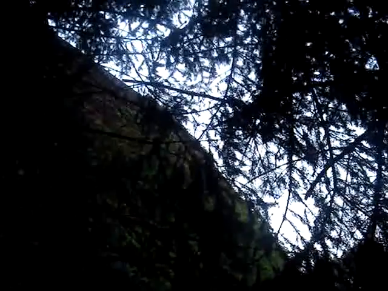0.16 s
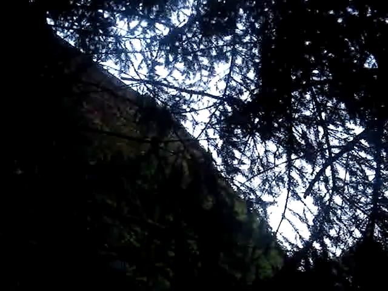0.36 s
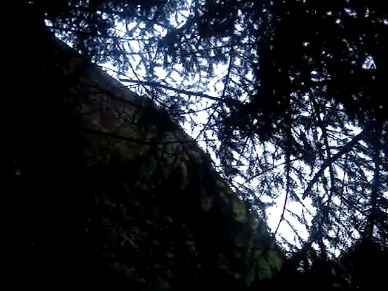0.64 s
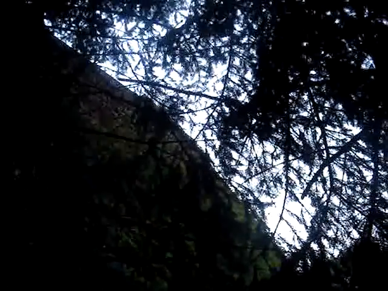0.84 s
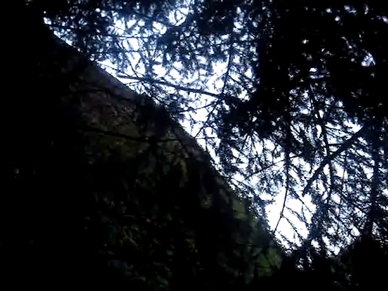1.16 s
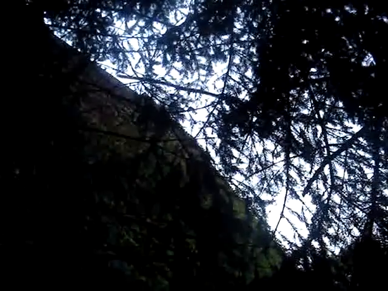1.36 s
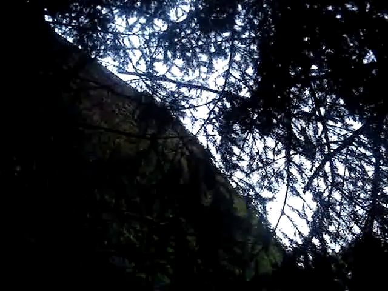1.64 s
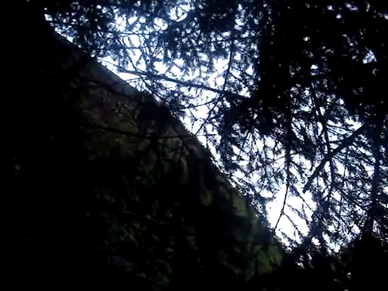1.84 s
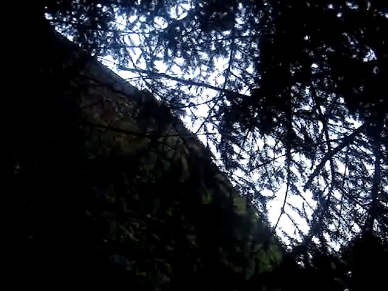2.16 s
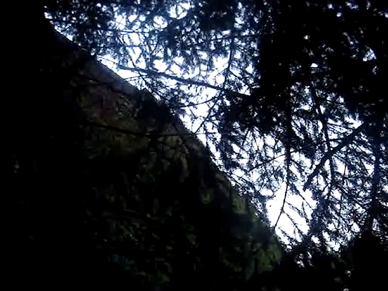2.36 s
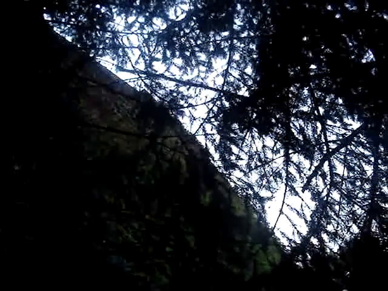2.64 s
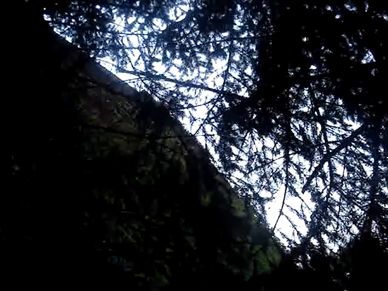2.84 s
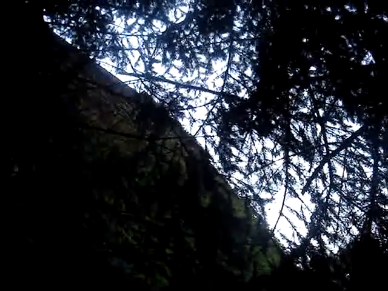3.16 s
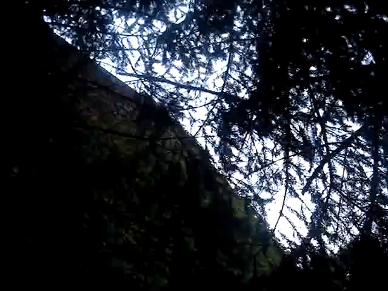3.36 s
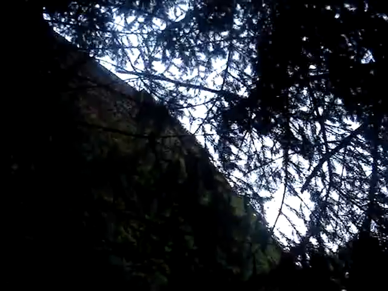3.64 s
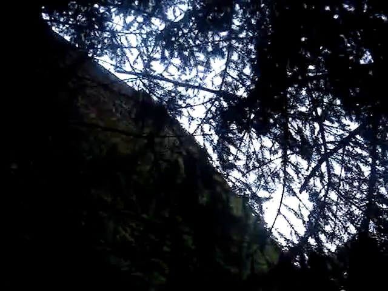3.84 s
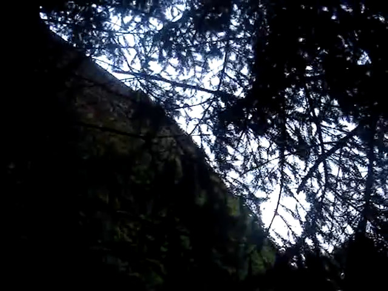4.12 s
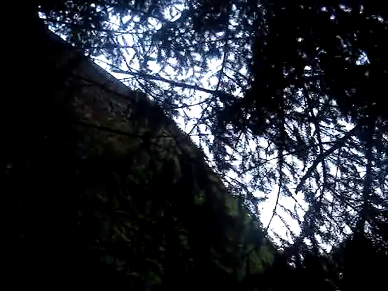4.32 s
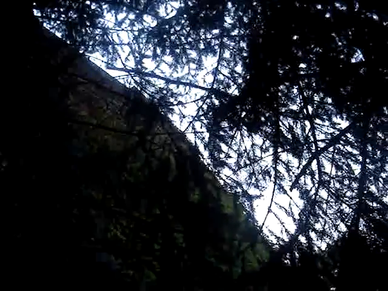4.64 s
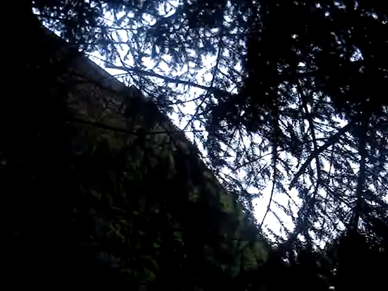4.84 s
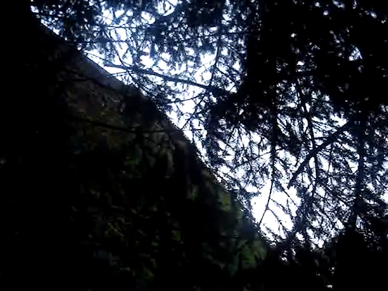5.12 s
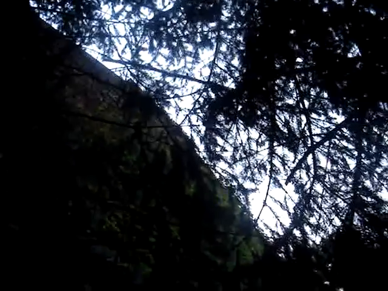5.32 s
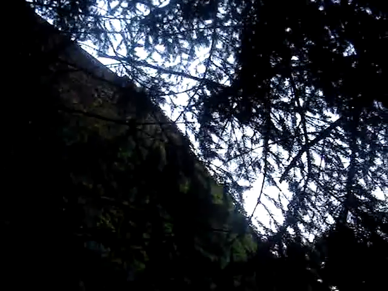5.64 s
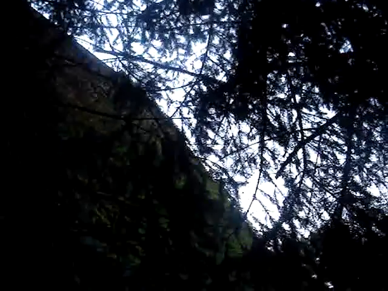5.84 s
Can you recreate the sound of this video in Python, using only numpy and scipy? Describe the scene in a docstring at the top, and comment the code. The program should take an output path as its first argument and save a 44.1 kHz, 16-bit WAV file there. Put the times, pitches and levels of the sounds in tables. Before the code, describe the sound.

Already in full cry at the start, countless birds twitter overhead, swelling and easing in quick flurries. Close chirps come first, crisp chips break through from one second, and faint low calls blur behind later. Squeaky, raspy squabbling adds treble. A single microphone below the trees also catches dim air noise and a far engine wavering, then speeding up near the end.

```python
"""A large flock of small birds chatters in the crowns of tall conifers, heard from the ground.
From the start near birds stand out in chains of arched whistles, while hundreds more merge in the wood's echo.
Sharp chips break through from one second on; soft low calls join later, between about 1.7 and 4.6 seconds.
Filtered noise gives the murmur of the outdoors and a faint drone; under it the two harmonics and noise
of a far engine waver in pitch, drop lowest at about 2.65 seconds, then speed up to the end."""
import sys
import numpy as np
from scipy import signal
from scipy.fft import rfft, irfft
from scipy.io import wavfile
from scipy.ndimage import uniform_filter1d

SR = 44100
rng = np.random.default_rng(int(sys.argv[2]) if len(sys.argv) > 2 else 0)


def wav_record(signal):
    """Record a signal, one row per channel, as 16-bit PCM in the file named by sys.argv[1]."""
    frames = np.transpose(np.atleast_2d(signal))
    bounded = np.clip(frames, -1, 1)
    # unit amplitude maps onto the largest positive 16-bit level
    quanta = np.round(bounded * 32767).astype(np.int16)
    wavfile.write(sys.argv[1], SR, quanta)


N = 263718

# Course of the flock's ordinary chatter. Each row: time in seconds, relative level in dB.
CHATTER_LEVEL = [(0.0, -32.5), (0.6, -25), (0.77, -33), (0.99, -27), (1.95, -28.9), (2.17, -25),
                 (2.38, -33.2), (2.6, -27), (3.04, -34), (3.11, -27), (3.25, -31), (3.52, -25.5),
                 (3.59, -32.5), (3.69, -30), (4.18, -27.5), (4.25, -30.5), (4.41, -22), (4.48, -29),
                 (4.55, -25.5), (5.12, -34.5), (5.32, -32), (5.64, -34), (5.81, -26.5), (5.98, -35.5)]
# Course of the treble, the high and excited calls. Each row: time in seconds, relative level in dB.
SHRILL_LEVEL = [(0.0, -45.7), (0.55, -37.5), (0.78, -48.5), (1.03, -39.5), (1.33, -40.5), (1.4, -37),
                (1.85, -38.5), (2.03, -47.9), (2.1, -35.5), (2.49, -42.5), (2.56, -38), (2.87, -43.5),
                (2.94, -43), (3.03, -50.5), (3.38, -39.5), (3.66, -54), (3.77, -40.5), (4.7, -41.5),
                (4.82, -36.5), (4.89, -47), (5.6, -45), (5.67, -40.5), (5.91, -48.5), (5.98, -35)]
# Course of the birds in the farthest trees. Each row: time in seconds, relative level in dB.
FAR_LEVEL = [(0, -35), (1.6, -37.5), (2.3, -34), (3.0, -37.5), (4.6, -38), (5.1, -40)]
# Small throats give little at the bottom of their range. Each row: frequency in Hz, gain in dB.
THROAT_RESPONSE = [(2000, -6), (2600, -3), (3100, 1), (4300, 0), (5200, -4)]
# Spectrum of the farthest calls. Each row: frequency in Hz, relative level in dB.
FAR_SPECTRUM = [(1500, -21.5), (2100, 1.5), (2700, 6.5), (4500, -6.5), (6200, -4), (10000, -21.5)]
# Two-note chirps of the nearest birds.
# Each row: start in seconds, length in seconds, starting pitch in Hz, relative level in dB.
NEAR_CHIRPS = [(0.093, 0.066, 4290, -26.5), (0.417, .084, 4650, -18.5), (0.59, 0.094, 4406, -25.5),
               (0.908, 0.066, 4750, -28), (1.025, 0.095, 4300, -32.5), (2.117, 0.092, 4565, -18.5),
               (4.356, .082, 4410, -27), (4.407, .078, 4510, -24), (5.299, 0.063, 4300, -21.5),
               (5.765, 0.098, 4500, -27)]
# Sharp chips, a flick of pitch up and down. Each row: start in seconds, top pitch in Hz, relative level in dB.
NEAR_CHIPS = [(1.018, 4650, -15.5), (1.735, 4360, -23), (2.686, 4960, -21), (3.373, 4620, -14.5),
              (4.347, 4250, -22), (5.752, 5020, -24.5)]
# Single notes of near birds.
# Each row: start in seconds, length in seconds, starting pitch in Hz, final pitch in Hz, relative level in dB.
NEAR_PEEPS = [(0.55, 0.053, 4660, 4560, -28.5), (0.563, 0.052, 3250, 3720, -24.5),
              (0.637, 0.034, 3060, 3056, -26), (0.77, 0.091, 5550, 3040, -34),
              (0.945, 0.029, 3410, 3370, -25.5), (0.977, 0.033, 4710, 5190, -26),
              (1.07, 0.063, 2967, 3200, -26), (1.117, 0.037, 3240, 3170, -25.5),
              (1.168, 0.036, 5900, 4270, -28.5), (1.258, 0.026, 3730, 3280, -29),
              (1.3, 0.13, 4680, 4750, -29), (1.61, .035, 3135, 3400, -31), (1.728, 0.034, 4400, 4820, -28),
              (1.798, 0.013, 6580, 6330, -35), (1.864, 0.041, 4050, 3400, -25),
              (1.973, .061, 4490, 4170, -29.5), (2.094, 0.028, 4720, 4380, -27.5),
              (2.242, .036, 3300, 3210, -27), (2.737, 0.023, 3670, 2820, -25.5),
              (2.772, 0.062, 3000, 3800, -29.5), (2.891, .059, 6870, 8260, -41.5),
              (2.915, 0.084, 3690, 3415, -27), (2.975, .04, 2250, 2050, -42.5),
              (3.12, 0.055, 3500, 3380, -34), (3.38, 0.024, 4010, 3280, -25),
              (3.417, 0.0546, 2953, 3080, -24.5), (3.515, 0.048, 3450, 3034, -27.5),
              (3.699, .027, 3940, 4600, -28), (3.937, 0.064, 4450, 3470, -34),
              (4.004, 0.053, 3100, 4000, -28), (4.049, 0.051, 3380, 3140, -29.5),
              (4.157, 0.057, 3400, 3480, -30), (4.539, .029, 3700, 3300, -25.5),
              (4.607, 0.085, 4530, 3740, -27.5), (4.664, 0.051, 2970, 3530, -27.5),
              (4.745, 0.08, 4170, 3830, -27.5), (4.813, .065, 4440, 3300, -30),
              (5.268, 0.034, 4880, 4400, -39.5), (5.321, .06, 3920, 2440, -26.5),
              (5.491, 0.1, 4030, 3850, -37), (5.651, 0.039, 4450, 3220, -35),
              (5.656, 0.035, 8300, 7200, -37), (5.782, 0.068, 7470, 6530, -42),
              (5.878, .032, 3750, 3070, -31), (5.948, 0.026, 4820, 5100, -32)]
# Faint low calls from farther off.
# Each row: start in seconds, length in seconds, top pitch in Hz, relative level in dB.
LOW_CALL_NOTES = [(1.719, 0.095, 1500, -51), (2.361, .1, 1460, -46.5), (2.535, .12, 1400, -47.5),
                  (3.096, 0.087, 1270, -51), (3.36, 0.086, 1590, -50), (4.537, 0.089, 1373, -48)]
# Spectrum of the outdoor murmur. Each row: frequency in Hz, relative spectral density in dB.
AIR_SPECTRUM = [(20, -17), (50, -2), (80, 2), (430, -1.5), (800, 0.5), (1700, -1.5), (6500, -10.5),
                (10000, -29.5)]
# Faint distant drone bands. Each row: centre in Hz, full width at half amplitude in Hz, level in dB.
DRONE_BANDS = [(220.6, 9.1, -61.5), (336.2, 4.1, -59.5), (438.6, 55, -54.5)]
# Course of the far engine. Each row: time in seconds, mean firing rate in Hz, relative level in dB.
ENGINE_COURSE = [(0, 85.6, -62.5), (1.1, 88, -55.5), (2.2, 79.6, -56), (2.5, 84, -50.5), (2.65, 69.7, -57),
                 (4.85, 74.95, -53.5), (5.35, 81.1, -47), (5.98, 96, -48)]

BOW = 1.04  # the middle of a note bulges above a straight glide by this ratio
FALL_RATIO, ARCH_RATIO = 0.77, 0.74  # end of the falling note and top of the arch, against the starting pitch
FALL_SHARE, ARCH_DB = 0.37, -1.5  # share of the chirp that the falling note takes; level of the arch
ARCH_RISE, ARCH_SAG = 0.87, 0.96  # the arch's start and end against its top
CHIP_S, CHIP_FOOT = 0.016, 0.78  # length of a chip in seconds; its start and end against the top pitch
TOP_HZ = 10100  # upper band edge


def whistle(length, start_hz, mid_hz, end_hz, waver=0.025, flutter_db=4.0, octave_db=-27, skew=0.9):
    """Frequency modulation: the syrinx sounds a trembling arch of pitch with a weak second harmonic."""
    t = np.arange(int(max(length, 0.01) * SR)) / SR
    u = t / t[-1]
    glide_hz = start_hz + (end_hz - start_hz) * u
    arch_hz = (mid_hz - (start_hz + end_hz) / 2) * 4 * u * (1 - u)
    trembling_hz = (glide_hz + arch_hz) * (1 + waver * wander(t, 494.0))
    phase = 2 * np.pi * np.cumsum(trembling_hz) / SR
    # skew below 1 makes the note start faster than it dies away
    effort = np.sqrt(np.abs(np.sin(np.pi * u ** skew)))
    effort = effort * undb(flutter_db * wander(t, 233.6))
    tone = np.sin(phase) + undb(octave_db) * np.sin(2 * phase)
    return unit(effort) * np.sqrt(2) * tone


def crowd(count, pitch_hz, drop, echo_db, pitch_spread=0.085, glide=0.72, glide_spread=0.1098,
          turn_spread=0.0797, waver=0.0329):
    """Superposition: birds at all distances each add a mostly falling note, then an arch lower by drop."""
    out = np.zeros(N + SR)  # the flock is already calling a second earlier
    starts = (np.arange(count) + rng.random(count)) / count * len(out) / SR
    for s, (voice, far, pace, bend, turn) in zip(starts, rng.standard_normal((count, 5))):
        hz = pitch_hz * np.exp(pitch_spread * voice)
        length = 0.033 * np.exp(0.3 * pace)
        gain = undb(7 * np.tanh(far / 2))
        lean = np.exp(glide_spread * np.tanh(bend))
        add(out, s, gain * whistle(length, hz / lean, hz * BOW, hz * glide * lean, waver))
        low_hz = hz * drop
        tilt = np.exp(turn_spread * np.tanh(turn))
        arch = whistle(length, low_hz * 1.06 / tilt, low_hz, low_hz * 0.84 * tilt, waver)
        add(out, s + length, gain * arch)
    out = (out + undb(echo_db) * wood(out, t60=0.18, count=2000))[SR:]
    # so many callers together keep an even level: divide by the short-term rms
    return out / np.sqrt(uniform_filter1d(out ** 2, SR // 14) + 1e-12)


def harsh_rasp(t):
    """Amplitude-modulated noise: harsh calls add short spurts of broad noise."""
    noise = rng.standard_normal(N)
    rasp = unit(colour(noise, [(2000, -20.5), (4500, 5.0), (10000, -17)]))
    return rasp * undb(10.7 * np.tanh(wander(t, 45)))


def farthest_calls(t, chatter_db, follow):
    """Statistical limit: very many smeared calls tend to noise, here a flickering wash."""
    wash = unit(colour(rng.standard_normal(N), FAR_SPECTRUM))
    wash *= undb(2 * wander(t, 25.36))
    # it swells by a part of the nearer chatter's swing in dB
    return wash * undb(follow * (chatter_db - chatter_db.mean()))


def flock(chirps_db=1, shrill_db=2.0, squeaks_db=-7, rasp_db=-4.0, far_db=0.0, echo_db=-6.5, follow=0.53):
    """Addition of bands: chirps, shrill squabbling with squeaks and rasp, and the far blur, each with a level."""
    t = np.arange(N) / SR
    chatter_db, = curves(CHATTER_LEVEL)
    high_db, = curves(SHRILL_LEVEL)
    far_level_db, = curves(FAR_LEVEL)
    chirps = colour(crowd(count=560, pitch_hz=4067, drop=0.82, echo_db=echo_db), THROAT_RESPONSE)
    shrill = crowd(count=300, pitch_hz=5116, drop=0.92, echo_db=echo_db)
    squeaks = crowd(count=200, pitch_hz=7350, drop=0.9, echo_db=echo_db, pitch_spread=0.19)
    excited = undb(shrill_db) * shrill + undb(squeaks_db) * squeaks
    excited += undb(rasp_db) * harsh_rasp(t)
    # flurries of calling lift and lower both bands together, many times a second
    flurry = np.tanh(wander(t, 11))
    chirps *= undb(1.6 * flurry)
    excited *= undb(2 * flurry)
    far = farthest_calls(t, chatter_db, follow)
    out = undb(chatter_db + chirps_db) * chirps
    out += undb(high_db) * excited
    return out + undb(far_level_db + far_db) * far


def chirp(length, hz, overlap_s=0.0046, waver=0.028, flutter_db=3):
    """Successive glides: a falling note overlaps the start of a lower arch."""
    fall_s = length * FALL_SHARE
    end_hz, top_hz = hz * FALL_RATIO, hz * ARCH_RATIO
    out = np.zeros(int(length * SR))
    fall = whistle(fall_s + overlap_s, hz, BOW * (hz + end_hz) / 2, end_hz, waver, flutter_db)
    arch = whistle(length - fall_s, top_hz * ARCH_RISE, top_hz, top_hz * ARCH_SAG, waver, flutter_db)
    add(out, 0, fall)
    add(out, fall_s, undb(ARCH_DB) * arch)
    return out


def near_birds(chirps_db=-1, chips_db=-3.0, peeps_db=-1.56, boughs_db=-12, trunks_db=-13, scatter_db=-6):
    """Direct and scattered sound: near calls, quick scatter from boughs, a longer tail from trunks."""
    out, peeps = np.zeros(N), np.zeros(N)
    for s, length, hz, db in NEAR_CHIRPS:
        add(out, s, undb(db + chirps_db) * chirp(length, hz))
    for s, hz, db in NEAR_CHIPS:
        foot_hz = hz * CHIP_FOOT
        chip = whistle(CHIP_S, foot_hz, hz, foot_hz, flutter_db=6, skew=0.63)
        add(out, s, undb(db + chips_db) * chip)
    for s, length, start_hz, end_hz, db in NEAR_PEEPS:
        mid_hz = BOW * (start_hz + end_hz) / 2
        add(peeps, s, undb(db + peeps_db) * whistle(length, start_hz, mid_hz, end_hz, waver=0.03))
    # the single notes come from deeper in the foliage and are scattered more
    out += peeps + undb(scatter_db) * wood(peeps, t60=0.032, count=2000)
    boughs = undb(boughs_db) * wood(out, t60=0.081, count=2000)
    trunks = undb(trunks_db) * wood(out, t60=0.13, count=2000)
    return out + boughs + trunks


def low_callers(gain_db=1.1, echo_db=-4, droop=0.84):
    """Reverberant blur: soft, wavering arches well below the flock's pitch are smeared by the wood."""
    out = np.zeros(N)
    for s, length, hz, db in LOW_CALL_NOTES:
        add(out, s, undb(db + gain_db) * whistle(length, hz * droop, hz, hz * droop, waver=0.049))
    return out + undb(echo_db) * wood(out, t60=0.068, count=2000)


def wood(x, t60, count):
    """Multiple reflection: trunks and boughs return count echoes that decay 60 dB in t60 seconds."""
    delay, size = rng.random(count) * 0.8, rng.standard_normal(count)
    echoes = np.zeros(SR)
    decay = np.exp(-np.log(1000) * delay / t60)
    np.add.at(echoes, ((delay + 0.003) * SR).astype(int), size * decay)
    return signal.fftconvolve(x, echoes / np.linalg.norm(echoes))[:len(x)]


def far_engine(t, engine_db, second_db):
    """Periodic excitation: the firing rate sets a fundamental and second harmonic, with a broad roar."""
    firing_hz, level_db = curves(ENGINE_COURSE)
    phase = 2 * np.pi * np.cumsum(firing_hz * (1 + 0.0092 * wander(t, 10))) / SR
    note = unit(np.sin(phase) + undb(second_db) * np.sin(2 * phase))
    roar = unit(colour(rng.standard_normal(N), [(40, -25), (120, -3.0), (800, 5.0), (3000, -49)]))
    return undb(level_db + engine_db) * (note * undb(wander(t, 11.0)) + roar)


def drone():
    """Resonance: narrow peaks select steady hums from noise."""
    f = np.fft.rfftfreq(N, 1 / SR)
    out = np.zeros(N)
    for hz, width, db in DRONE_BANDS:
        resonance = 1 / (1 + (2 * (f - hz) / width) ** 2)
        out += undb(db) * unit(irfft(rfft(rng.standard_normal(N)) * resonance, N))
    return out


def distance(air_db=-40.5, engine_db=0, second_db=-14):
    """Background noise: slowly wavering outdoor murmur, a faint drone and a far engine."""
    t = np.arange(N) / SR
    murmur = unit(colour(rng.standard_normal(N), AIR_SPECTRUM)) * undb(air_db + 0.5 * wander(t, 2))
    return murmur + drone() + far_engine(t, engine_db, second_db)


def undb(db):
    """Logarithmic level: decibels to amplitude gain."""
    return 10 ** (np.asarray(db) / 20)


def unit(x):
    """Effective value: scale to rms 1."""
    return x / np.sqrt(np.mean(x ** 2) + 1e-18)


def curves(table):
    """Linear interpolation: one value a sample for each column after the time in seconds."""
    s, *columns = np.transpose(table)
    return [np.interp(np.arange(N) / SR, s, c) for c in columns]


def colour(x, points):
    """Linear filtering: weight the spectrum by (Hz, dB) points joined on a log frequency axis."""
    hz, db = np.transpose(points)
    f = np.maximum(np.fft.rfftfreq(len(x), 1 / SR), 1)
    gain = undb(np.interp(np.log(f), np.log(hz), db))
    return irfft(rfft(x) * gain, len(x))


def wander(t, rate):
    """Random modulation: normal values about 0, rate a second, joined by lines."""
    return np.interp(t * rate % 511, np.arange(512), rng.standard_normal(512))


def add(out, s, x):
    """Superposition: mix x into out, starting at s seconds."""
    i = int(s * SR)
    a, b = max(i, 0), min(i + len(x), len(out))
    if b > a:
        out[a:b] += x[a - i:b - i]


def scene():
    """Superposition: the flock, its near birds, low callers and far surroundings, in one channel."""
    return (flock() + near_birds() + low_callers() + distance())[None]


def record(dry):
    """Band limitation: an elliptic low-pass cuts the top steeply."""
    return signal.sosfilt(signal.ellip(12, 0.2, 85, TOP_HZ, fs=SR, output="sos"), dry)


dry = scene()
out = record(dry)
wav_record(out)
```